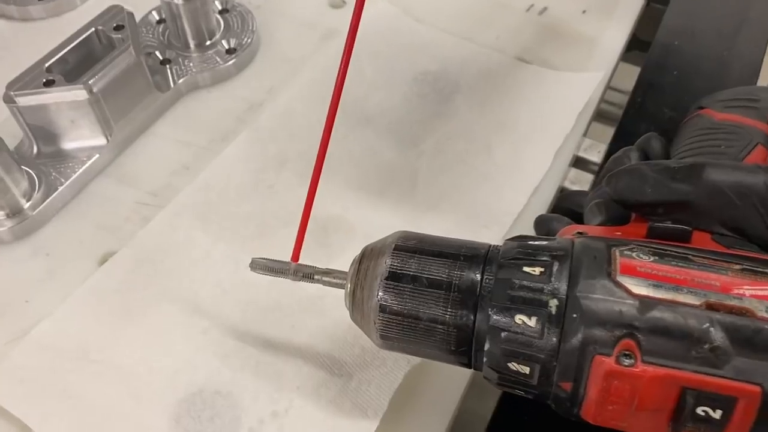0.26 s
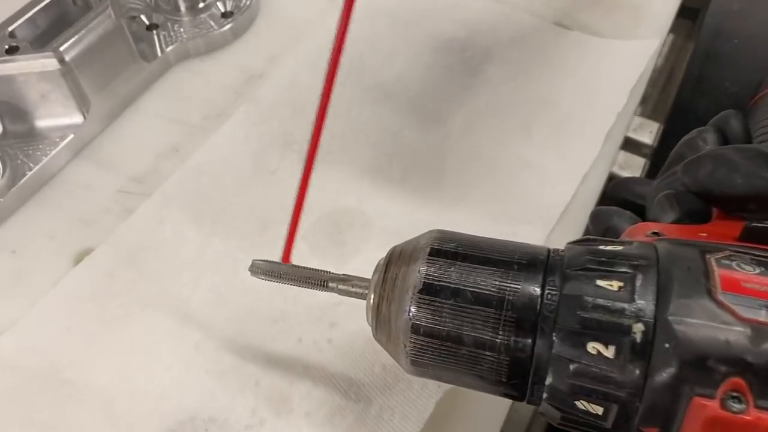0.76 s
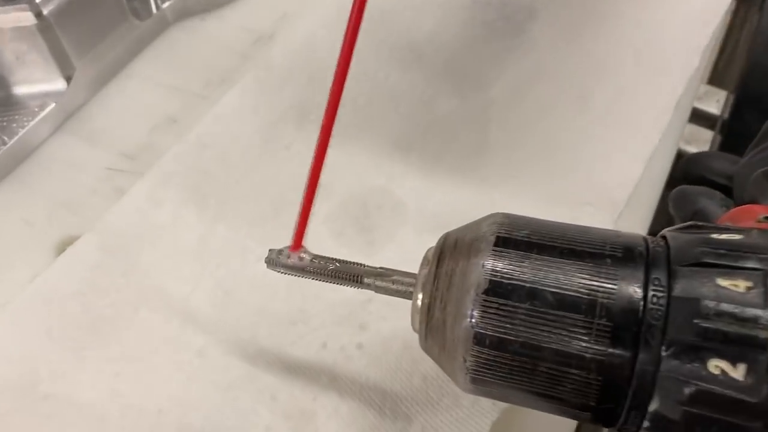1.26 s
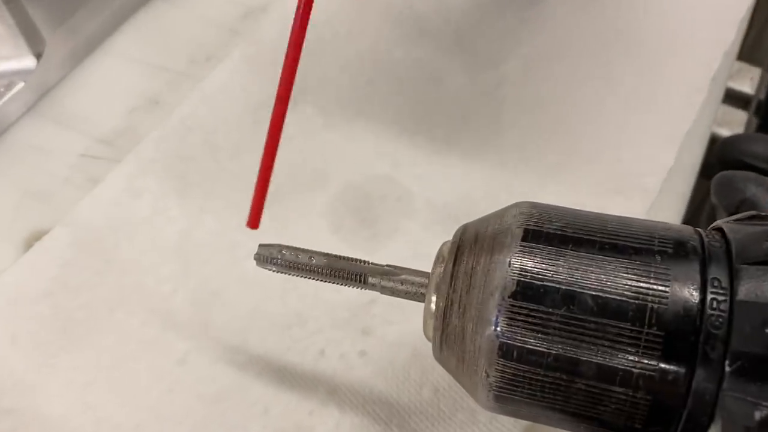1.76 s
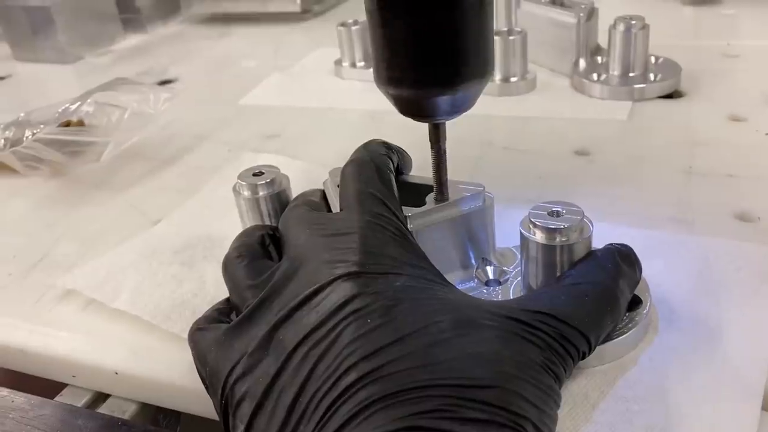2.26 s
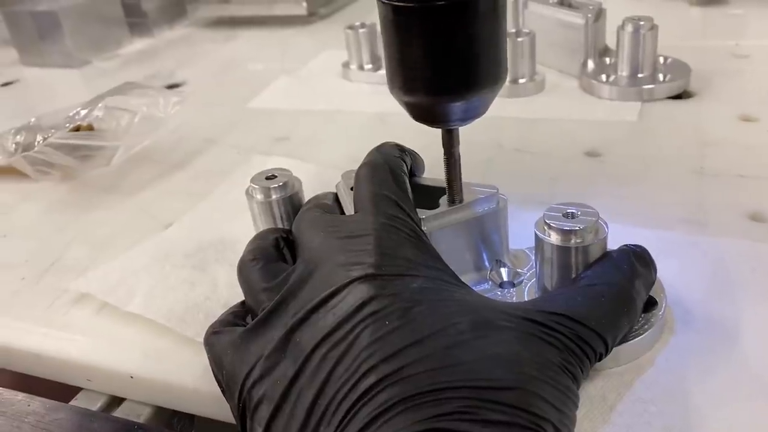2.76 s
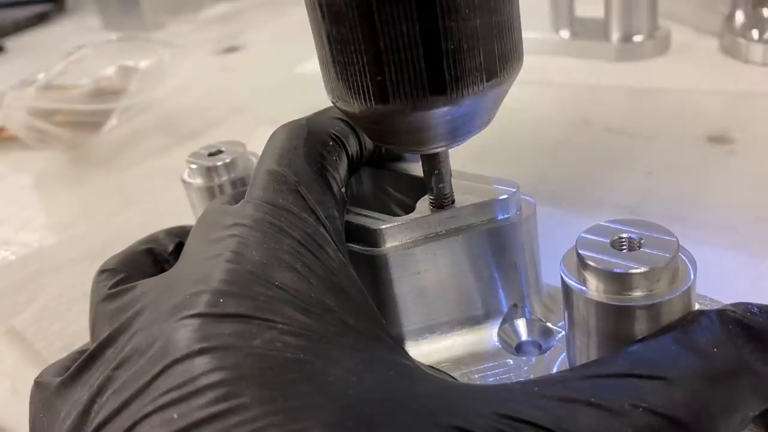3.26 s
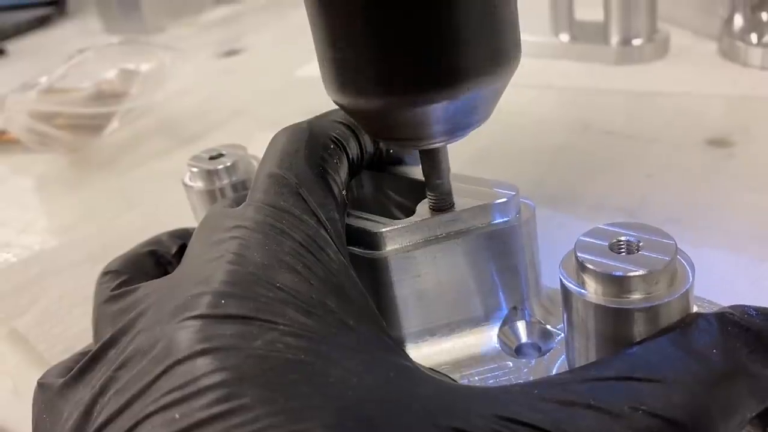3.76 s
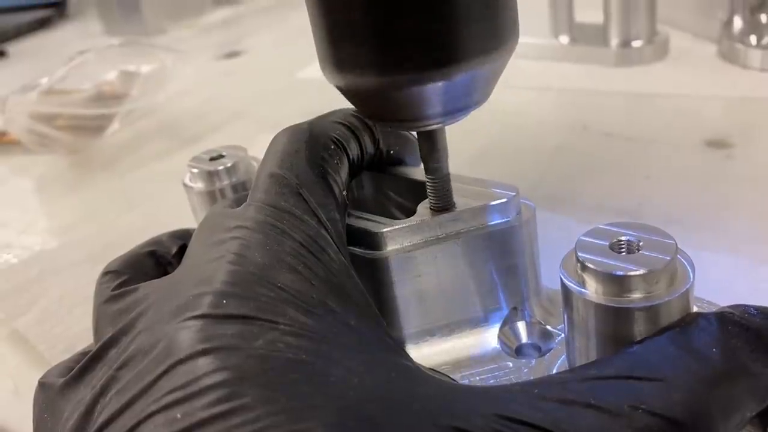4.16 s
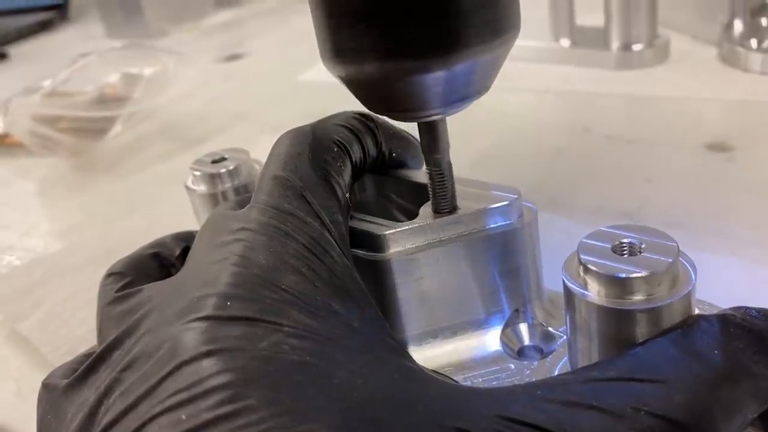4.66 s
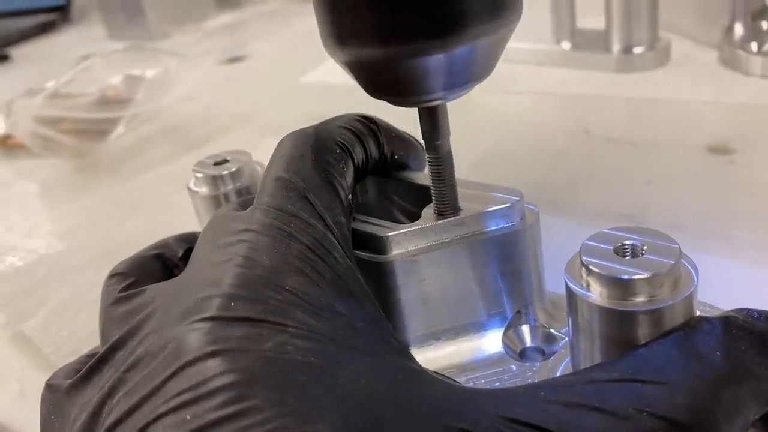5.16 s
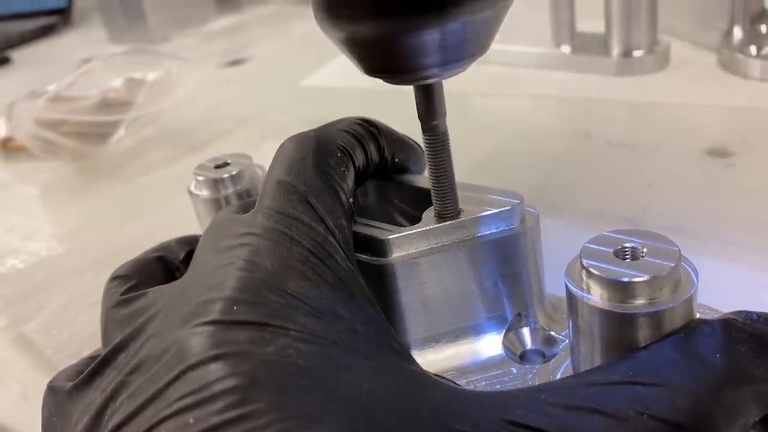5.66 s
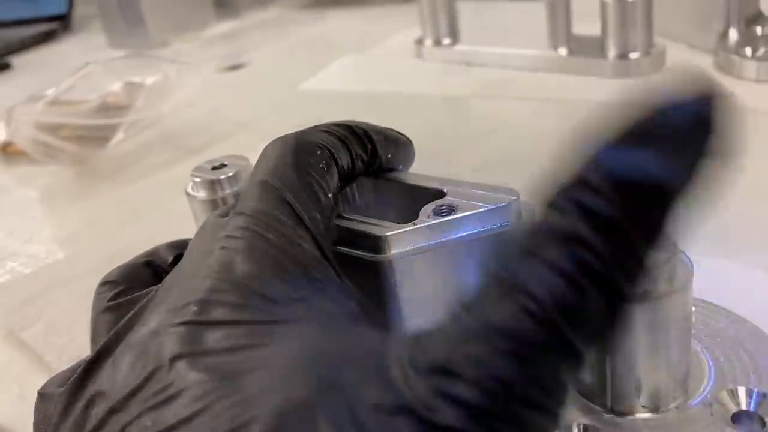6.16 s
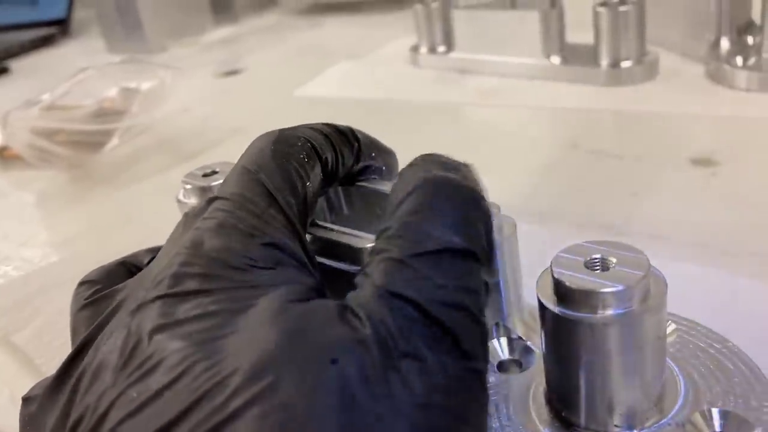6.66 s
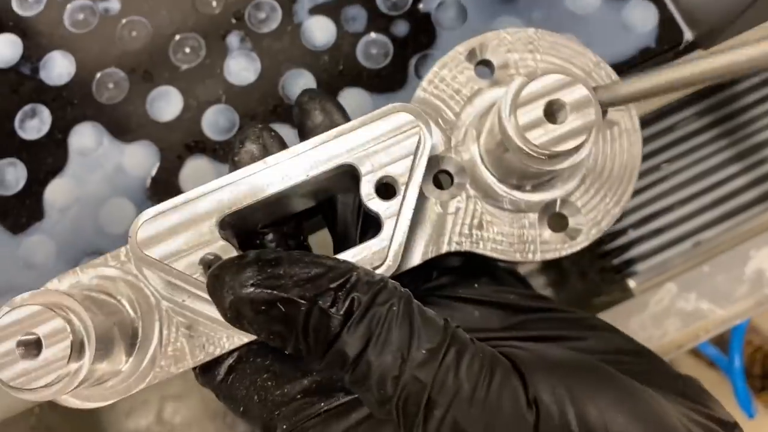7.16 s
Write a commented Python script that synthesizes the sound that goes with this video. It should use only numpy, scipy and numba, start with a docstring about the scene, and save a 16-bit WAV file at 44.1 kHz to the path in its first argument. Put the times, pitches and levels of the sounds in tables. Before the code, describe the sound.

In a workshop with a low, distant machine rumble, a spray can clicks and gives a short hiss close to the microphone. A cordless drill turns slowly into a metal part with rattling gears, a thin whistle and a low buzz. After sharp switch clicks it runs faster, its whine rising, sagging and climbing again. It stops with a click, a rubber glove rustles faintly, and an air gun hisses.

```python
"""A workshop bench, close to a phone's two microphone ports, with machines rumbling far off. A valve clicks
and a can hisses oil through its straw onto a tap. A cordless drill creeps the tap into an aluminium part,
gears rattling, the part buzzing on the bench. A glove rustles, the drill is switched over and backs the
tap out, its whine sagging and recovering. The glove rustles again, then an air gun blows the part clean."""
import sys
import numpy as np
from scipy import signal
from scipy.fft import rfft, irfft, next_fast_len
from scipy.io import wavfile
from scipy.ndimage import uniform_filter1d
from numba import njit

SR = 44100
rng = np.random.default_rng(int(sys.argv[2]) if len(sys.argv) > 2 else 0)


def dump(signal):
    """Clip the signal to [-1, 1] and save it as 16-bit WAV at the path in sys.argv[1]."""
    limited = np.clip(np.atleast_2d(signal).T, -1, 1)
    pcm = np.round(limited * 32767).astype(np.int16)
    wavfile.write(sys.argv[1], SR, pcm)


N = 327663
T = np.arange(N) / SR


def undb(db):
    return 10 ** (np.asarray(db) / 20)

def unit(x):
    return x / np.sqrt(np.mean(x ** 2))

def butter(order, hz, kind="low"):
    return signal.butter(order, hz, kind, fs=SR, output="sos")

def band_unit(x, lo_hz, hi_hz):
    """Scale so that one band has rms 1."""
    band = signal.sosfilt(butter(3, [lo_hz, hi_hz], "band"), x)
    return x / np.sqrt(np.mean(band ** 2))

def gate(start_s, end_s):
    """Open between two times, with 2 ms edges."""
    return uniform_filter1d(1. * ((T > start_s) & (T < end_s)), 90)

def curve(rows):
    """A timed table's columns at every sample, then a gate open over its span."""
    times, *columns = np.transpose(rows)
    return [np.interp(T, times, column) for column in columns] + [gate(times[0], times[-1])]

def bursts(rows, attack_s, fall_db_s):
    """Gain of (start_s, hold_s, level_db) events: a straight rise, a hold, a steady fall in dB."""
    return sum(undb(db - fall_db_s * np.clip(T - start - attack_s - hold, 0, 1))
               * np.clip((T - start) / attack_s, 0, 1) * (T < start + 1) for start, hold, db in rows)

def walk(rate_hz):
    """Smoothed random steps with a spread near 1."""
    hold = int(SR / rate_hz)
    steps = np.repeat(rng.standard_normal(N // hold + 1), hold)
    return 1.3 * uniform_filter1d(uniform_filter1d(steps, hold), hold)[:N]

@njit
def bandpass(x, hz, width_hz):
    """State-variable band-pass, gain 1 at the centre."""
    y, band, low = np.empty(len(x)), 0., 0.
    g, damping = np.tan(np.pi * hz / SR), width_hz / hz
    for i in range(len(x)):
        v = (band + g * (x[i] - low)) / (1 + g * (g + damping))
        band, low, y[i] = 2 * v - band, low + 2 * g * v, damping * v
    return y

def noise_band(hz, width_hz):
    return unit(bandpass(rng.standard_normal(N), float(hz), float(width_hz)))

def shape(x, colour, peaks=()):
    """Filter by (freq_hz, level_db) points and (freq_hz, width_hz, lift_db) resonances."""
    size = next_fast_len(N)
    f = np.arange(size // 2 + 1) * SR / size + 1
    freqs, levels = np.transpose(colour)
    db = np.interp(np.log(f), np.log(freqs), levels)
    db += sum(lift / (1 + (2 * (f - hz) / width) ** 2) for hz, width, lift in peaks)
    return irfft(rfft(x, size) * undb(db), size)[:N]

def hiss(flicker_db, rate_hz, grain_db):
    """Grainy noise whose half-octave bands flicker independently."""
    grains = rng.standard_normal(N)
    grains *= undb(grain_db * uniform_filter1d(rng.standard_normal(N), 40) * np.sqrt(40))
    return sum(undb(flicker_db * walk(rate_hz)) * bandpass(grains, hz, hz / 1.9)
               for hz in 40 * 2 ** np.arange(0, 8.8, .5))

def tone(hz, waver_db, rate_hz):
    """A sine of rms near 1 whose strength wavers."""
    phase = 2 * np.pi * np.cumsum(hz * np.ones(N)) / SR
    return np.sqrt(2) * np.sin(phase) * undb(waver_db * walk(rate_hz))


# The far end of the shop: time_s, machines_db, fan_db
SHOP_LEVELS = [(0, -54.5, -49), (1.6, -51.5, -49.5), (2.1, -50.5, -58), (3.4, -57.5, -66),
               (6.25, -60.5, -74), (6.97, -62, -71), (6.985, -71, -80), (7.43, -81, -85)]
# Machines as heard from the bench: freq_hz, level_db
SHOP_COLOUR = [(25, -31.5), (45, -13), (85, -5.5), (120, -8.5), (220, -21.5), (400, -27.5), (700, -39.5),
               (1500, -46), (2700, -52), (6000, -62), (7900, -50), (9500, -67), (15500, -64)]

def far_machines(squeal_hz=14800, squeal_db=-81.5):
    """Distant rumble, alike at both ports in the bass, with a fan's boom and a thin high squeal."""
    machines_db, fan_db, _ = curve(SHOP_LEVELS)
    mid, side = (shape(hiss(2.4, 6, 0), SHOP_COLOUR) for _ in range(2))
    side = signal.sosfilt(butter(1, 300, "high"), side)
    rumble = np.array([mid + side, mid - side]) / np.std(mid)
    squeal = tone(squeal_hz, 3, 30) + .64 * noise_band(squeal_hz - 100, 400)
    boom = unit(bandpass(noise_band(57, 28), 57., 14.))
    return undb(machines_db) * rumble + undb(fan_db) * boom + undb(squeal_db) * squeal


# Valve, switch, trigger and small knocks, close by: start_s, level_db, ring_hz, body_share_db
CLICKS = [(0.2183, -33, 5530, -18.5), (0.2379, -17.5, 7250, -7.5), (0.263, -21.5, 7200, -40.5),
          (0.2726, -9, 6970, -17), (0.4505, -45, 4220, -2), (0.8766, -60, 3430, 6),
          (1.1917, -41.5, 6930, -10), (1.208, -49, 3500, -4), (1.2424, -48, 3440, 2), (1.261, -56, 3720, 7),
          (1.32, -57, 3340, 6.5), (1.3313, -52.5, 6860, 5), (1.3468, -54.5, 7020, 6),
          (1.749, -49, 7050, 3.5), (1.934, -55.5, 3350, 10.5), (1.996, -51, 7200, 4), (3.399, -49, 4250, 8),
          (3.487, -8.5, 6380, -17.5), (3.5024, -26.5, 7470, -23.5), (3.512, -31, 4630, -25),
          (3.5995, -27.5, 6700, -5.5), (3.607, -26, 4290, -1), (3.6243, -12, 4450, -30),
          (3.6284, -16, 6430, -6), (6.0537, -26.5, 3860, 5.5), (6.0644, -9, 4700, -15),
          (6.0735, -16, 4300, -8), (6.2586, -40, 5000, -4), (6.289, -46, 4940, -7), (6.57, -40, 7000, -25),
          (6.8543, -47, 3370, 1)]
# Modes of the plastic body: pitch_hz, level_db, t60_s
BODY_MODES = [(700, 1, 0.015), (1015, -3, 0.019), (2000, -1.5, 0.015), (3540, -1, 0.0074)]

def plastic_clicks(pan_db=6, rise_s=.0007):
    """Left of centre, each click is a crack, a short high ring and body modes, a little detuned."""
    out, t = np.zeros(N), np.arange(1500) / SR
    for start_s, db, ring_hz, body_db in CLICKS:
        crack = .53 * rng.standard_normal(len(t)) * (.87 * np.exp(-t / .0013) + .16 * np.exp(-t / .005))
        edge = .5 * np.diff(crack, prepend=0) * (ring_hz / 7000) ** 1.2
        ring = np.sin(2 * np.pi * ring_hz * t) * np.exp(-t / .0018) * (db > -40)  # soft ones stay dry
        detunes = np.exp(.1 * rng.standard_normal(len(BODY_MODES)))
        body = sum(undb(mode_db - 60 * t / t60) * np.sin(2 * np.pi * hz * detune * t)
                   for detune, (hz, mode_db, t60) in zip(detunes, BODY_MODES))
        click = edge + .33 * crack + .4 * ring + .54 * undb(body_db) * body
        i = int(start_s * SR)
        out[i:i + len(t)] += undb(db) * click * np.clip(t / rise_s, 0, 1)
    return out * undb([[pan_db / 2], [-pan_db / 2]])


# The full squirt and a weak second one: start_s, hold_s, level_db
SQUIRT = [(.228, .18, -39)]
DRIBBLE = [(1.05, 0.16, -64)]
# Their mists at close range: freq_hz, level_db
SQUIRT_COLOUR = [(200, -9.5), (400, -13), (1050, -6), (1500, -8), (2000, -11.5), (2800, -3.5), (4200, -5.5),
                 (5300, -1.5), (9000, -1.5), (12000, -3), (15500, -2)]
DRIBBLE_COLOUR = [(300, -13), (1200, -5), (2800, -1), (5000, -12), (7000, -16), (11500, -13), (15500, -16)]
# Resonances of the straw: freq_hz, width_hz, lift_db
STRAW = [(1750, 300, 11), (2850, 330, 12), (4100, 450, 10), (5600, 500, 5)]

def oil_spray():
    """Gas hisses through the straw; a last mist trails off after the valve shuts."""
    mist = hiss(3, 40, 2.4)
    flow = bursts(SQUIRT, .0061, 1400) + undb(-15.5) * bursts(SQUIRT, .008, 224)
    full_flow_straw = np.array(STRAW) * [1, 1, .7]  # resonances stand out less at full flow
    squirt = band_unit(shape(mist, SQUIRT_COLOUR, full_flow_straw), 2000, 14000)
    dribble = band_unit(shape(mist, DRIBBLE_COLOUR, STRAW), 2100, 14000)
    return flow * squirt + bursts(DRIBBLE, .014, 900) * dribble


# Resonances of the drill's housing: freq_hz, width_hz, lift_db
HOUSING = [(820, 507, 9), (1969, 320, 11.5), (3294, 500, 7.5), (4230, 740, 10), (6360, 2300, 8.5)]

def gear_rattle(colour, low_gain, treble_gain, top_gain, throb):
    """Teeth and bearings rattle through the housing; lows, treble and top each have their own gain."""
    rattle = band_unit(shape(hiss(1.08, 25, 1.83), colour, HOUSING), 210, 3400)
    low = signal.sosfiltfilt(butter(2, 2500), rattle)
    high = band_unit(rattle - low, 2900, 6500)
    treble = signal.sosfiltfilt(butter(2, 8000), high)
    return low * low_gain * np.sqrt(throb) + (treble * treble_gain + (high - treble) * top_gain) * throb


# Partials of the speed switch: multiple, forward_db, reverse_db
CHOP_PARTIALS = [(1, -56, -50.5), (2, -53, -57), (3, -64, -82), (4, -49, -81), (8, -83, -69)]

def switch_whistle(backwards, waver_db, rate_hz, chop_hz=1865.2):
    """The speed switch chops the current and whistles at a steady pitch."""
    return sum(undb(reverse_db if backwards else forward_db) * tone(k * chop_hz, waver_db, rate_hz)
               for k, forward_db, reverse_db in CHOP_PARTIALS)


# Low rattle swelling as the tap goes in: time_s, relative_db
CREEP_LEVELS = [(2.078, -41), (2.55, -39), (2.7, -35.5), (3.343, -34)]
# Slow gears at close range: freq_hz, level_db
CREEP_COLOUR = [(60, -10), (220, 6), (700, 4.5), (1050, 0.5), (1500, -2.5), (2700, -5), (5300, -14),
                (9000, -10.5), (12000, -10), (15500, -13.5)]
# Faint glides of the straining motor: start_s, end_s, from_hz, to_hz, level_db
STRAIN_GLIDES = [(2.118, 2.38, 547, 592, -52), (2.421, 2.59, 556, 579, -49),
                 (2.623, 3.103, 447.4, 479, -49.5), (2.867, 2.993, 330, 320, -45.5),
                 (3.151, 3.343, 439, 353, -48.5)]

def drill_forward():
    """The drill creeps in under load: gears rattle, the switch whistles, the motor strains."""
    low_db, running = curve(CREEP_LEVELS)
    strain = np.zeros(N)
    for start_s, end_s, from_hz, to_hz, db in STRAIN_GLIDES:
        hz = np.interp(T, [start_s, end_s], [from_hz, to_hz]) * (1 + .012 * walk(30.03))
        strain += gate(start_s, end_s) * undb(db) * tone(hz, .66, 24.46)
    whistle = switch_whistle(backwards=False, waver_db=1.5, rate_hz=8.7)
    rattle = gear_rattle(CREEP_COLOUR, undb(low_db - 2), undb(-44.5), undb(-44.5), throb=.65)
    return running * (rattle + whistle) + strain


# Partials of the part against the bench: multiple, light_db, pressed_db
BUZZ_PARTIALS = [(1, -45.5, -35), (2, -68, -43), (3, -72, -54)]

def bench_buzz(light_hz=79, pressed_hz=83, drone_hz=198):
    """The part hums under the drill, higher and harsher while pressed hard; a low drone opens it."""
    running = curve(CREEP_LEVELS)[-1]
    press = np.interp(T, [2.43, 2.6, 2.95, 3.01], [0, 1, 1, 0])
    hz = light_hz + (pressed_hz - light_hz) * press
    buzz = sum(undb(light_db + (pressed_db - light_db) * press) * tone(k * hz, 1.34, 12)
               for k, light_db, pressed_db in BUZZ_PARTIALS)
    return running * buzz + bursts([(2.08, .41, -49)], .1, 150) * tone(drone_hz, .6, 12)


# A gloved hand moving near the microphone: start_s, hold_s, level_db
RUSTLES = [(3.32, 0.077, -51.5), (3.47, 0.0024, -47.5), (6.055, .005, -48.5), (6.15, 0.092, -61.5),
           (6.35, 0.027, -62), (6.55, 0.026, -71), (6.71, 0.14, -68), (6.86, .04, -66.5),
           (6.92, 0.012, -72)]
# Rubbing rubber: freq_hz, level_db
RUBBER_COLOUR = [(300, -3.5), (1200, -7), (2000, -10.5), (4000, -7), (7000, -10.5), (11000, -12.5),
                 (15500, -15.5)]

def glove(hollow_hz=1230.):
    """Rubber rustles, never quite still once the drill stops; a finger drags over the part's hollow."""
    rub = hiss(4, 25, 3)
    rubber = band_unit(shape(rub, RUBBER_COLOUR, [(1300, 150, 2.4), (3340, 260, 2.6)]), 840, 14000)
    movement = bursts(RUSTLES, .023, 260) + undb(-77.5) * (T > 6.08)
    hollow = unit(bandpass(bandpass(rub, hollow_hz, 400.), hollow_hz, 400.))
    return movement * rubber + bursts([(6.77, .041, -64)], .038, 300) * hollow


# The motor's whine while backing out: time_s, pitch_hz
MOTOR_PITCH = [(3.65, 299), (3.73, 452.4), (3.79, 539), (3.87, 589.4), (3.96, 563), (4.2, 398), (4.43, 287),
               (4.55, 240.7), (4.66, 224.1), (4.78, 241), (4.87, 308.2), (4.97, 376), (5.08, 421.4),
               (5.31, 516.6), (5.5, 552.2), (5.7, 587.5), (6.01, 558), (6.06, 509)]
# How speed sets the balance: pitch_hz, whine_db, mesh_db, treble_db, top_db
LEVELS_BY_SPEED = [(219, -54, -46.5, -46, -49), (281, -44, -41.5, -44.5, -47), (388, -39, -44, -40, -42),
                   (545, -38.5, -43.5, -38, -37.5), (593, -37.5, -49, -37.5, -37.5)]
# Partials of motor and gear mesh, both on the whine's pitch: multiple, relative_db
WHINE_PARTIALS = [(1, 0), (2, -10), (3, -14), (7, -17), (7.35, -25), (8, -22), (9, -17), (11.7, -20),
                  (12, -25), (17, -28), (18, -28), (20, -26)]
MESH_PARTIALS = [(1.31, -8), (3.39, -2), (6.78, -10), (10.1, -13), (13.4, -11)]
# Throb from the chuck's runout: time_s, depth
RUNOUT_DEPTH = [(4.95, 0.02), (5.4, 0.3), (5.75, .08), (6.08, 0)]
# Fast gears at close range: freq_hz, level_db
RUN_COLOUR = [(50, -17.5), (95, -4.5), (220, -2), (400, 5), (700, 5.5), (1500, -3.5), (2700, -5),
              (5300, -11.5), (9000, -17.5), (12000, -10.5), (15500, -13)]
# The gearbox lurching at start and stop: start_s, hold_s, level_db
JOLTS = [(3.625, 0.0074, -34.5), (3.7, 0.0057, -55), (6.068, 0.0035, -38.5)]
# The drill's bass: time_s, level_db
THRUM_LEVELS = [(3.6, -57), (4.8, -63), (5.2, -50.5), (6.06, -55.5)]

def drill_reverse(on_s=3.588, off_s=6.062, spin_up_s=.1, cycles_per_turn=46, throb_peak_s=5.46):
    """Motor and gear tones follow the speed; the chuck's runout makes the gears throb once a turn."""
    hz, spinning = curve(MOTOR_PITCH)
    speeds, *levels = np.transpose(LEVELS_BY_SPEED)
    whine_db, mesh_db, treble_db, top_db = (np.interp(np.log(hz), np.log(speeds), db) for db in levels)
    trigger = gate(on_s, off_s)
    free = np.interp(T, [5.43, 5.93], [0, 1])  # the tap runs free: mesh and treble rattle fade
    turns = np.cumsum(hz) / cycles_per_turn / SR
    turns -= np.interp(throb_peak_s, T, turns)
    throb = 1 + curve(RUNOUT_DEPTH)[0] * np.cos(2 * np.pi * turns)
    # the motor's upper tones only stand out near full speed
    whine = sum(undb(db + .5 * free * (k > 4)) * (hz / 585) ** min(k - 1, 5)
                * tone(k * hz * (1 + .003 * walk(30)), 1.9, 30) for k, db in WHINE_PARTIALS)
    # the gears' upper tones sing under load
    mesh = sum(undb(db) * (300 / np.maximum(hz, 300)) ** (k / 4.3)
               * tone(k * hz * (1 + .013 * walk(70)), 2.8, 70) for k, db in MESH_PARTIALS)
    tones = undb(whine_db) * whine + undb(mesh_db - 18 * free) * mesh * throb
    tones = shape(tones, [(100, -10), (15000, -1)], HOUSING)
    whistle = switch_whistle(backwards=True, waver_db=3.1, rate_hz=30)
    whistle *= np.interp(T, [5.2, 5.6], [1, .3])  # less chopping as the trigger is squeezed home
    spin = trigger * np.clip(.27 + (T - on_s) / spin_up_s, 0, 1)
    low = spin * undb(-41.5 + 1.6 * walk(14)) + bursts(JOLTS, .0027, 380)
    rattle = gear_rattle(RUN_COLOUR, low, spin * undb(treble_db - 9.5 * free), spin * undb(top_db), throb)
    thrum = undb(curve(THRUM_LEVELS)[0]) * noise_band(88, 47)
    return rattle + trigger * (whistle + thrum) + spinning * tones


# The air jet at close range: freq_hz, level_db
JET_COLOUR = [(200, -30), (700, -21.5), (1050, -23), (1500, -22), (2700, -23), (3800, -7.5), (5300, -7),
              (7200, -8.5), (9000, -6), (12000, -4), (15500, -6)]
# Breathy whistles on edges: pitch_hz, width_hz, relative_db
EDGE_WHISTLES = [(7080, 300, -9.5), (10300, 350, -15), (11900, 350, -18), (14700, 400, -8.5)]
# The jet crossing a bore: start_s, hold_s, level_db
BORE_CROSSINGS = [(6.97, 0.012, -48), (7.06, 0.059, -48.5), (7.29, 0.011, -46)]
# The bore's peak and dip: freq_hz, width_hz, lift_db
BORE = [(1520, 220, 7), (2400, 580, -7)]

def air_gun(start_s=6.978, jet_db=-43, steady_roar_db=-53):
    """The jet hisses and whistles on edges; the bore's roar swells when the jet crosses it."""
    jet_peaks = [(7600, 650, 1.9), (10200, 350, 1.9), (14200, 800, 2.2)]
    jet = band_unit(shape(hiss(2.6, 40, 1.1), JET_COLOUR, jet_peaks), 2800, 8600)
    jet += sum(undb(db + 3.6 * walk(9)) * noise_band(hz, width) for hz, width, db in EDGE_WHISTLES)
    roar = unit(shape(hiss(4.2, 30, 1.4), [(500, -21.5), (1200, -8.5), (2700, 7.5), (4500, -16)], BORE))
    roar *= undb(steady_roar_db) + bursts(BORE_CROSSINGS, .014, 175)
    valve = np.clip((T - start_s) / .004, 0, 1)
    return valve * (undb(jet_db) * jet + roar)


def place(x, pan_db, lag_samples, scatter_s=.006, scatter_share=.6):
    """Above the bass the left port is louder and earlier; the right hears much of it off the bench."""
    bass = signal.sosfilt(butter(1, 200), x)
    upper = x - bass
    scatter = rng.standard_normal((4, 1200)) * np.exp(-np.arange(1200) / SR / scatter_s)
    paths = [signal.fftconvolve(upper, echo / np.linalg.norm(echo))[:N] for echo in scatter]
    bounced = sum(path * walk(25) for path in paths) / 2  # hands and tools move, so paths take turns
    right = np.sqrt(1 - scatter_share) * np.roll(upper, lag_samples) + np.sqrt(scatter_share) * bounced
    return bass + np.array([upper * undb(pan_db / 2), right * undb(-pan_db / 2)])

def room(x, t60_s=.25, wet_db=-20):
    """Bench and walls send back a decaying scatter, different at each port, without the bass."""
    t = np.arange(int(.4 * SR)) / SR
    tails = rng.standard_normal((2, len(t))) * undb(-60 * t / t60_s)
    tails = signal.sosfilt(butter(1, 300, "high"), tails / np.linalg.norm(tails[0]))
    return x + undb(wet_db) * signal.fftconvolve(x.mean(0, keepdims=True), tails, axes=1)[:, :N]

def scene():
    """The work close by and left of the microphone, the shop far behind it."""
    near = (plastic_clicks()
            + place(oil_spray(), pan_db=2.6, lag_samples=10)
            + place(drill_forward(), pan_db=1.95, lag_samples=2)
            + place(glove(), pan_db=1.5, lag_samples=2)
            + place(drill_reverse(), pan_db=6.1, lag_samples=2)
            + place(air_gun(), pan_db=3.7, lag_samples=6))
    return far_machines() + room(near) + bench_buzz() * undb([[-.7], [.7]])

def record(dry):
    """The phone feeds one port's treble to both sides, late and inverted on the left; the top is cut."""
    crossover_hz, lag_samples, top_hz = 6600, 10, 15900
    size = next_fast_len(N)
    f = np.arange(size // 2 + 1) * SR / size
    share = np.clip((f - crossover_hz) / 1200 + .5, 0, 1)
    ports = rfft(dry, size)
    delay = np.exp(-2j * np.pi * f * lag_samples / SR)
    treble = undb(2.5) * np.array([-delay * ports[0], ports[0]])
    mixed = irfft(ports * (1 - share) + treble * share, size)[:, :N]
    return signal.sosfilt(signal.ellip(10, .2, 70, top_hz, fs=SR, output="sos"), mixed)


dry = scene()
out = record(dry)
dump(out)
```